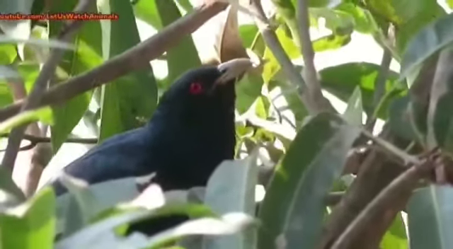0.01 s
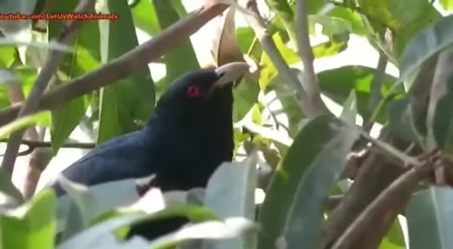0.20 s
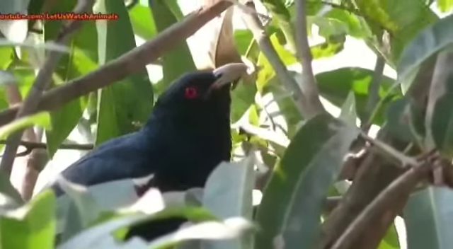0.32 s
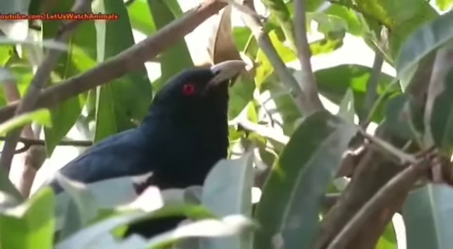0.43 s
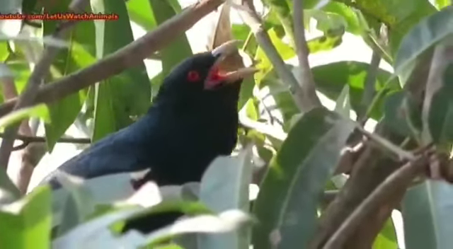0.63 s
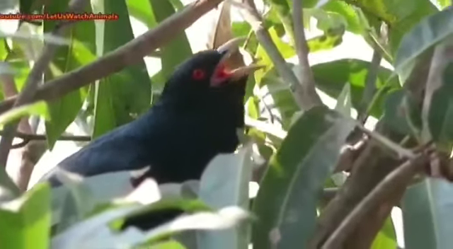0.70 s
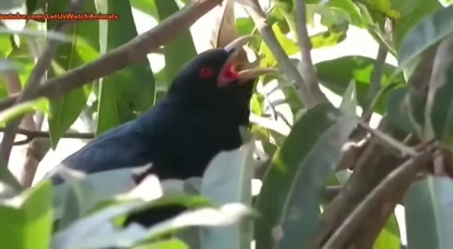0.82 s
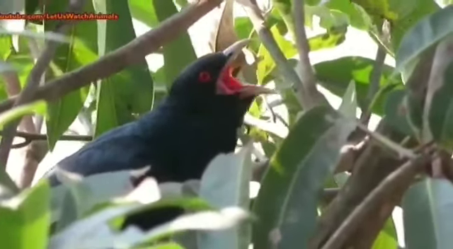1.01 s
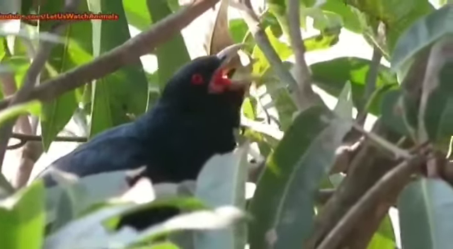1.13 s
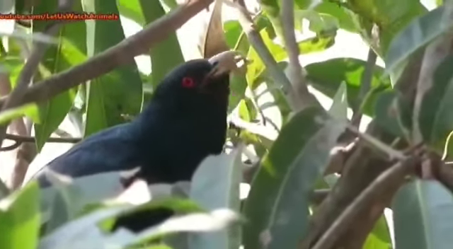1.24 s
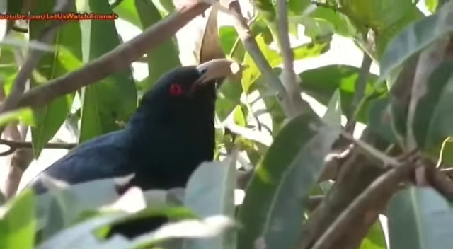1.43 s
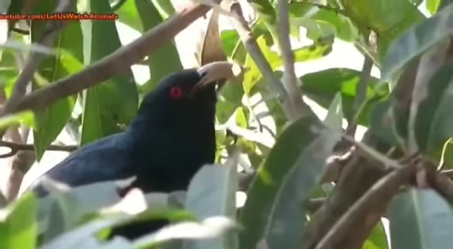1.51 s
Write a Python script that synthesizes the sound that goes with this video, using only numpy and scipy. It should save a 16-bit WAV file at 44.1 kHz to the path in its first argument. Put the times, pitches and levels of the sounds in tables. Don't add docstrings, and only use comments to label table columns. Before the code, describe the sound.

A koel close by whistles one loud, clear note that holds level, climbs, then drops quickly. A wavering echo trails after it, over low traffic hum and faint far birds, captured outdoors on a camera microphone.

```python
import sys
import numpy as np
from scipy import signal
from scipy.fft import rfft, irfft
from scipy.io import wavfile
from scipy.ndimage import uniform_filter1d, minimum_filter1d

SR = 44100
rng = np.random.default_rng(int(sys.argv[2]) if len(sys.argv) > 2 else 0)


def materialize(psi):
    bounded = np.clip(np.atleast_2d(psi).T, -1, 1)
    quanta = np.round(bounded * 32767).astype(np.int16)
    wavfile.write(sys.argv[1], SR, quanta)


def volts(x):
    e = np.asarray(x, float) / 20
    return 10 ** e


N = 70560

# time in seconds, pitch in Hz.
PITCH = [
    (.185, 1297),
    (.255, 1281),
    (.29, 1269),
    (.385, 1281),
    (.48, 1409),
    (.55, 1528),
    (.605, 1552),
    (.65, 1484),
    (.775, 1003),
]


def curve(table, x):
    return np.interp(x, *np.array(table, float).T)


def level(x, db):
    return x * volts(db) / np.sqrt(np.mean(x ** 2))


def walk(rate):
    hold = int(SR / rate)
    steps = np.repeat(rng.standard_normal(200), hold)[np.arange(N) % (200 * hold)]
    return 1.52 * uniform_filter1d(uniform_filter1d(steps, hold), hold)


def smooth(x, seconds):
    k = max(int(seconds * SR), 1)
    return uniform_filter1d(uniform_filter1d(x, k), k)


def tail(t, db, t60):
    return volts(db - 60 * t / t60) * np.sqrt(2 * np.log(1000) / (SR * t60))


def scatter(x, shape, side_db):
    clouds = rng.standard_normal((2, N)) * shape
    mid, side = (signal.fftconvolve(x, cloud)[:N] for cloud in clouds)
    return mid + volts(side_db) * side * np.array([[1], [-1]])


def town():
    # frequency in Hz, level per Hz in dB.
    spectrum = [
        (45, -3),
        (100, -6),
        (170, -1.5),
        (260, -10),
        (1500, -18.5),
        (4200, -38.5),
        (6600, -44.5),
        (8000, -51),
    ]
    # frequency in Hz, level relative to the middle in dB.
    spread = [
        (30, -21),
        (70, -10),
        (125, -23),
        (500, -20),
        (2000, -15),
        (5000, -7),
        (12000, -1),
    ]
    low_hz, top_hz = 41.5, 13500
    f = np.maximum(np.arange(N // 2 + 1) * SR / N, 1)

    def over_log_hz(table):
        hz, db = np.array(table).T
        return np.interp(np.log(f), np.log(hz), db)

    mid, side = rfft(rng.standard_normal((2, N))) * volts(over_log_hz(spectrum)) * np.clip(f / low_hz, 0, 1) ** 3
    slope_db = -10 * np.log2(np.maximum(f / spectrum[-1][0], 1))
    top = volts(slope_db) / (1 + (f / top_hz) ** 20)
    pair = top * (mid + volts(over_log_hz(spread)) * side * np.array([[1], [-1]]))
    out, swell = 0, walk(1.7)
    for octave in np.arange(4, 14.5, .5):
        band = np.clip(1 - 2 * abs(np.log2(f) - octave), 0, 1)
        out = out + irfft(pair * band, N) * volts(0.15 * swell + 1.22 * walk(9.3))
    return level(out, -29.5)


def far_calls(t):
    # start in seconds, length in seconds, start pitch in Hz, end pitch in Hz, level in dB.
    calls = [(.08, .21, 790, 810, -40), (1.2, .05, 4350, 4500, -60), (1.245, .065, 4550, 4750, -54),
             (1.32, .035, 4820, 4960, -51), (1.315, .06, 4650, 4720, -58), (1.36, .035, 4940, 4990, -49),
             (1.035, .07, 4950, 4650, -62), (1.45, .07, 6450, 6500, -62), (1.34, .13, 720, 705, -46),
             (1.48, .13, 840, 860, -43), (1.52, .06, 6650, 6700, -66), (.335, .05, 3500, 3300, -52)]
    out = 0
    for start, length, hz0, hz1, db in calls:
        u = np.clip((t - start) / length, 0, 1)
        hz = (hz0 + (hz1 - hz0) * u) * (1 + .005 * walk(60))
        swell = (1 + .4 * walk(60)) * np.sqrt(4 * u * (1 - u))
        out = out + volts(db) * swell * np.sin(2 * np.pi * np.cumsum(hz) / SR)
    return out + scatter(out, tail(t, -4, .15), -12)


def nulls(t):
    # time in seconds, gain in dB (negative cancels), width in seconds.
    beats = [(.273, -11.5, .0048), (.3, -5.5, 0.027), (.323, -4.5, .008), (.386, -4, 0.0067),
             (0.4, -17.5, 0.0056), (0.427, -12.5, 0.0053), (0.449, -9, 0.0074), (0.494, 3, 0.0026),
             (.507, -7, 0.0029), (.524, -1, 0.0036), (0.534, -7.5, 0.0025), (0.547, -14.5, 0.0024),
             (0.555, -6.5, 0.0084), (0.583, 0.5, 0.0026), (0.616, -6, 0.0064), (0.64, -9, 0.0059),
             (0.653, -1.5, 0.0024), (0.667, 4.5, 0.0012), (0.691, -7, 0.006), (0.726, -1, 0.0044),
             (0.744, -4, 0.0028), (.76, 1, 0.0046), (.776, 0, 0.0071), (0.933, -6.5, 0.0063),
             (0.894, 3, 0.012), (0.967, 3, 0.0075), (1.08, -1, .012), (1.135, -0.5, 0.013)]
    return volts(sum(db * np.exp(-.5 * ((t - s) / width) ** 2) for s, db, width in beats))


def echoes(whistle, overtones, t):
    walls = tail(t, -3.5, 0.53) + tail(t, -25.5, 3.1)
    walls = walls * np.clip(t / .065, 0, 1)
    back = scatter(whistle, walls, -19)
    carrier = np.exp(2j * np.pi * np.cumsum(smooth(curve(PITCH, t), 0.054)) / SR)
    same_pitch = signal.filtfilt(*signal.butter(2, 70, fs=SR), back / carrier) * carrier
    singing = smooth(1. * (t < PITCH[-1][0]), .02)
    back = back - 2 * .9 * singing * same_pitch.real
    leaves = scatter(overtones, tail(t, 0.5, 0.3), -14)
    return nulls(t) * back + leaves


def koel(t):
    # time in seconds, level in dB.
    effort = [
        (.185, -38.5),
        (.203, -19),
        (.245, -10),
        (.365, -8.5),
        (.47, -1),
        (.51, -3.5),
        (.6, -4),
        (.672, -4.5),
        (.715, -13.5),
    ]
    # multiple of the pitch, level in dB.
    beak_shut = [(2, -38.5), (3, -59), (4, -43.5), (5, -40.5), (6, -55), (7, -44), (8, -60), (9, -48.5),
                 (10, -64), (11, -46.5), (12, -59)]
    beak_open = [(2, -35.5), (3, -42.5), (4, -41), (5, -33.5), (6, -61), (7, -43), (8, -40), (9, -41),
                 (10, -72.5), (11, -64.5), (12, -71.5)]
    shut_hz, open_hz = 1370, 1544
    hiss_hz, hiss_width_hz, hiss_db = 1960, 290, -33
    port_lag_s = 19e-6
    overtone_db, flutter_db = -9, 2

    hz = smooth(curve(PITCH, t), 0.038) * (1 + 0.0013 * walk(30))
    phase = 2 * np.pi * np.cumsum(hz) / SR
    lag = np.pi * hz * port_lag_s * np.array([[1], [-1]])
    gate = smooth(1. * (t > effort[0][0]) * (t < PITCH[-1][0]), .006)
    fade_db = -230 * np.maximum(t - effort[-1][0], 0)
    size = np.sqrt(2) * volts(smooth(curve(effort, t) + fade_db, 0.0058)) * gate

    hiss_peak = signal.iirpeak(hiss_hz, hiss_hz / hiss_width_hz, fs=SR)
    hiss = signal.lfilter(*hiss_peak, rng.standard_normal(N))
    hiss = size * level(hiss, hiss_db)

    heard, sent_overtones = size * nulls(t) * np.sin(phase + lag), 0
    beak = np.clip((hz - shut_hz) / (open_hz - shut_hz), 0, 1)
    push = np.clip((t - .19) / 0.03, 0, 1) * np.clip((.785 - t) / 0.053, 0, 1)
    facing = np.clip((.73 - t) / .08, .2, 1)
    for (k, shut_db), (_, open_db) in zip(beak_shut, beak_open):
        k = round(k)
        db = overtone_db + shut_db + beak * (open_db - shut_db)
        flutter = flutter_db * (walk(90) + .5 * np.array([walk(72), walk(73)]))
        tone = np.sqrt(2) * push * volts(db) * (k * hz < .45 * SR)
        turn = rng.uniform(0, 2 * np.pi) + .5 * np.array([walk(70), walk(70)])
        port_phase = turn[0] + k / 12 * 5.0 * (turn - turn[0])
        heard = heard + facing * tone * volts(flutter) * np.sin(k * phase + lag + port_phase)
        sent_overtones = sent_overtones + tone * np.sin(k * phase + turn[0])

    echo_tilt = volts(4 * np.log2(hz / shut_hz))
    sent_whistle = size * echo_tilt * np.sin(phase) + hiss
    return heard, sent_whistle, sent_overtones


def scene():
    t = np.arange(N) / SR
    heard, whistle, overtones = koel(t)
    return heard + echoes(whistle, overtones, t) + far_calls(t) + town()


def low_pass(x):
    return signal.sosfilt(signal.butter(12, 15400, fs=SR, output="sos"), x)


def record(dry):
    duck_s, duck_db, attack_s, release_s = 0.4618, -10.5, 0.019, 0.65
    since = np.maximum(np.arange(N) / SR - duck_s, 0)
    wet = dry * volts(duck_db * (1 - np.exp(-since / attack_s)) * np.exp(-since / release_s))
    ceiling = volts(-3)
    limit = ceiling / np.maximum(abs(wet).max(axis=0), ceiling)
    limit = uniform_filter1d(minimum_filter1d(limit, size=133), size=89)
    return low_pass(wet * limit)


dry = scene()
out = record(dry)
materialize(out)
```